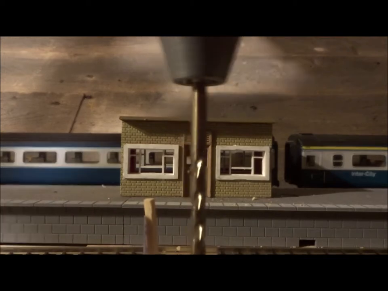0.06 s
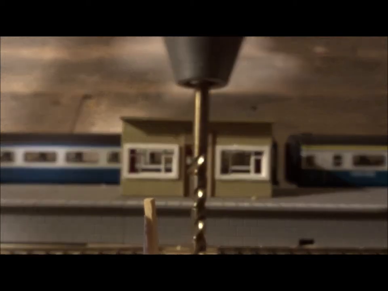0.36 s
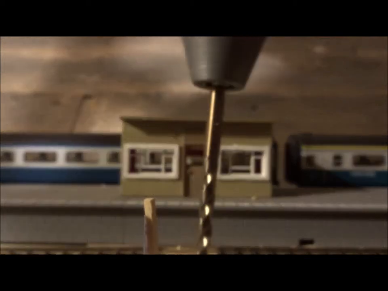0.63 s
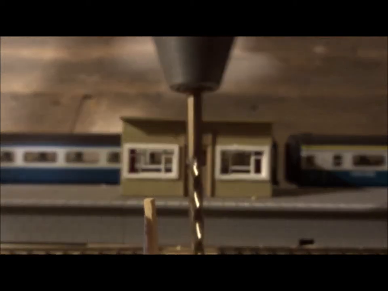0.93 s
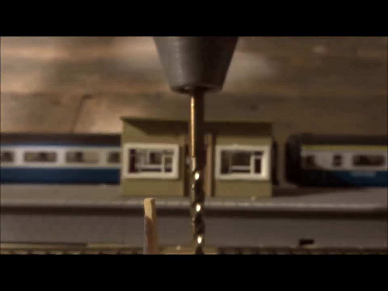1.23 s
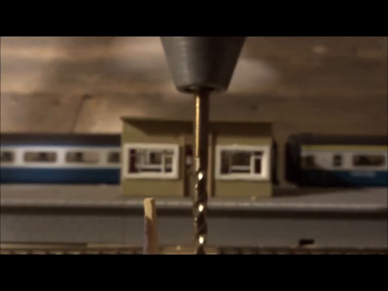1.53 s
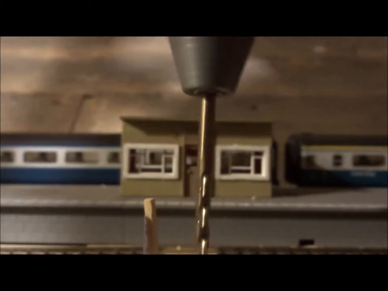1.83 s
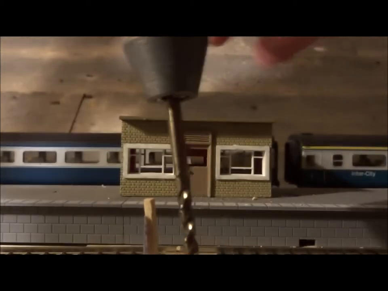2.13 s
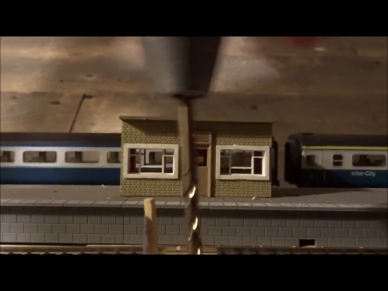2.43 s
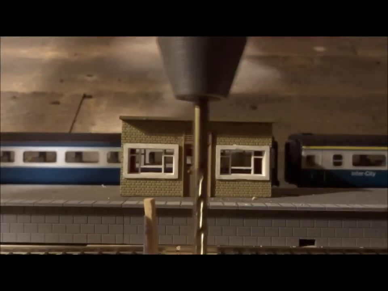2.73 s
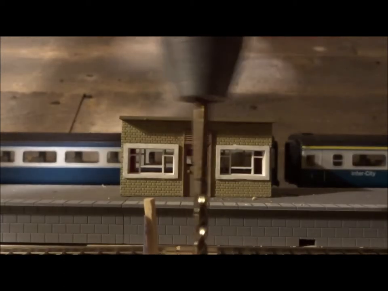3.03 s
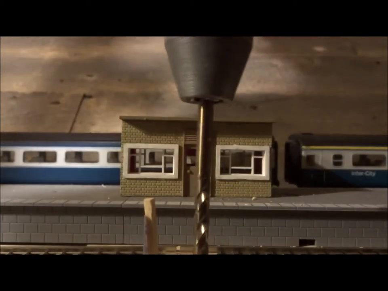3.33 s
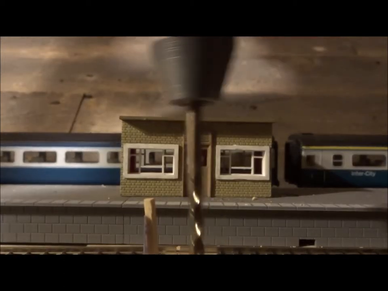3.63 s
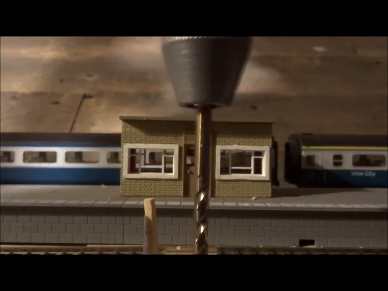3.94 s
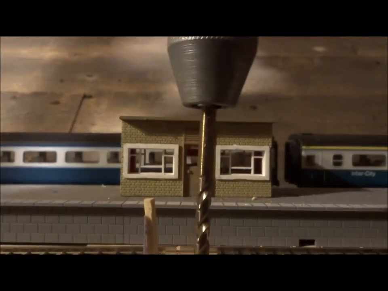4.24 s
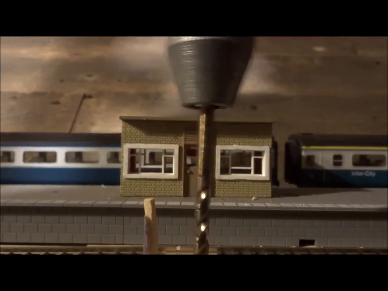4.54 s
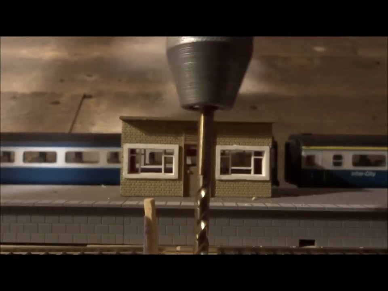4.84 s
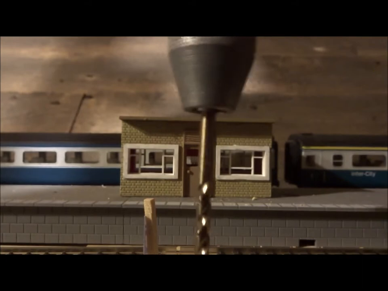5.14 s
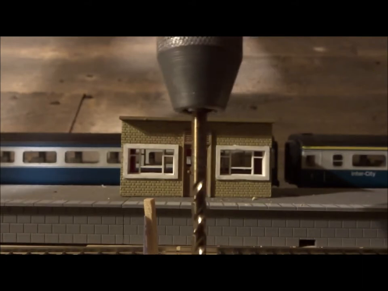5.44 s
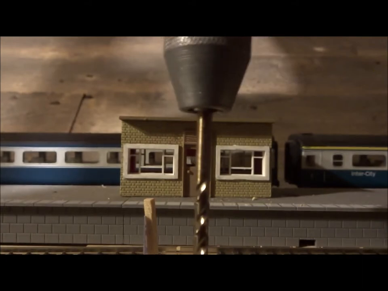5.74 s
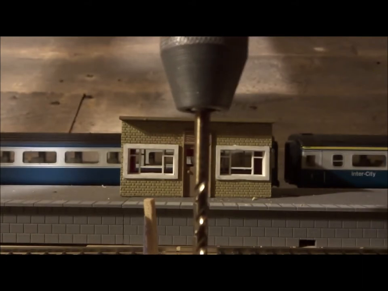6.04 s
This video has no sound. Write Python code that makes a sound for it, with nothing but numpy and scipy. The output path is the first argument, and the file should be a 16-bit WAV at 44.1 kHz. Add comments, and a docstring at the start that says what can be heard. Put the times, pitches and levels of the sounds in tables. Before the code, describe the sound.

A drill bit is turned by hand into a wooden board, close to a stereo microphone in a small room. It starts with a soft hiss in the hole, then from 0.5 seconds grinds and snaps fibres, the board resounding hollowly. Just after 1 second the loose steel chuck clacks several times and rings thinly. The bit binds with a short high squeak at 1.7 seconds and cracks at 1.9. The hardest cracking comes around 2.6 seconds, with another squeak. Sharp chuck clacks and a thin metallic singing follow near 3 seconds. Uneven, crackling strokes return from 3.3 to 3.8 seconds, then another clack just after 4. A last quick run of squeaks near 4.9 seconds leads to a rattle and scrape of the chuck around 5.3, then fainter rasping. A faint fan-like whirr lies to the left throughout.

```python
"""A twist bit turned by hand into a wooden baseboard in a small room; stereo microphone, close up.
The flutes hiss in the hole, then the lips grind and snap fibres and the board resounds. After 1 s the
loose chuck clacks, rubs and sets its steel ringing. The bit binds and squeaks at 1.7 s and cracks
hardest around 2.6 s. Strokes and clacks alternate up to a last run of squeaks near 4.9 s and a rattle
of the chuck. A faint fan-like whirr lies behind throughout, to the left."""
import sys
import numpy as np
from scipy import signal
from scipy.fft import rfft, irfft
from scipy.io import wavfile

SR = 44100
rng = np.random.default_rng(int(sys.argv[2]) if len(sys.argv) > 2 else 0)


def master_out(mix):
    """Clip the mix to full scale and print it as 16-bit PCM to the path in sys.argv[1]."""
    frames = np.transpose(np.atleast_2d(mix))
    ceiling = np.clip(frames, -1, 1)
    pcm = np.round(ceiling * 32767).astype(np.int16)
    wavfile.write(sys.argv[1], SR, pcm)


N = 268128
TIME = np.arange(N) / SR
SHORT = TIME[:SR // 2]  # time axis of the impulse responses

# Table levels are relative: each source adds its own gain.
# the lips bite, the load builds and lets go: (peak time [s], grind [dB], rasp [dB], rise [s], fall [s])
CUTTING_STROKES = [(0.01, -49.5, -56, 0.11, 0.11), (0.2, -52, -57, 0.15, 0.18),
                   (0.47, -52.5, -59, 0.22, 0.15), (0.72, -43, -48.5, 0.21, 0.12),
                   (0.96, -40.5, -48, 0.19, 0.096), (1.07, -55, -44, 0.071, 0.048),
                   (1.19, -50, -54.5, 0.15, 0.22), (1.745, -40.5, -49.5, 0.11, 0.073),
                   (1.94, -42, -49, 0.12, 0.085), (2.11, -54.5, -58, 0.21, 0.22),
                   (2.435, -42.5, -55, 0.047, 0.054), (2.525, -37.5, -44, 0.04, 0.044),
                   (2.66, -39, -43.5, 0.19, 0.1), (3.39, -45.5, -54.5, 0.13, 0.14),
                   (3.715, -42.5, -50.5, 0.22, 0.2), (4.21, -47.5, -56, 0.15, 0.18),
                   (4.78, -76, -54, 0.079, 0.26), (4.9, -40, -50.5, 0.11, 0.12),
                   (5.28, -54, -54.5, 0.34, 0.28)]
# the loudest fibres snapping at the lips: (time [s], crack [dB], splinter [dB])
FIBRE_SNAPS = [(0.4822, -45.5, -45), (0.676, -53, -54), (0.689, -42, -50), (0.706, -48, -58),
               (0.721, -42, -52), (0.7365, -37, -48), (0.749, -40, -47), (0.8272, -39.5, -48),
               (0.886, -45.5, -66), (0.9115, -46, -53), (0.9279, -38, -54), (0.964, -33, -53),
               (0.982, -49, -62), (1.655, -45.5, -49), (1.77, -40, -36.5), (1.8347, -47, -60),
               (1.9122, -25.5, -27.5), (1.928, -45, -61), (1.951, -41, -46), (2.4194, -34.5, -35.5),
               (2.5076, -27, -28.5), (2.5146, -30, -30.5), (2.527, -43, -43), (2.547, -38, -46),
               (2.602, -36.5, -43), (2.6315, -24.5, -28), (2.651, -23, -33), (2.6743, -27.5, -46),
               (2.8742, -47, -51), (3.3636, -40, -48.5), (3.3939, -43, -59), (3.4164, -39, -55),
               (3.4308, -61, -47), (3.573, -50, -51), (3.6201, -39.5, -52), (3.636, -46, -52),
               (3.6782, -35, -36), (3.6897, -31.5, -34.5), (3.7029, -39, -40), (3.7592, -35, -41),
               (4.4655, -46.5, -46), (4.7134, -52, -53), (4.7745, -51.5, -48.5), (4.8351, -48, -45.5),
               (5.0136, -52, -51), (5.528, -53, -83)]
# the bit binds and jerks free: (time [s], level [dB], pitch [Hz])
BIT_SQUEAKS = [(1.692, -40.5, 3660), (1.721, -31.5, 3550), (1.7327, -29, 3500), (1.7424, -28.5, 3500),
               (1.7513, -32, 3490), (2.652, -22, 3670), (2.6625, -26.5, 3470), (4.8506, -41.5, 3700),
               (4.8644, -32.5, 3500), (4.88, -29.5, 3600), (4.8927, -25, 3630), (4.9047, -31, 3580),
               (4.919, -39, 3650)]
# the wood gives under the load with a hollow knock: (time [s], level [dB], pitch [Hz])
WOOD_KNOCKS = [(0.178, -51, 228), (0.362, -51, 136), (0.429, -50.5, 400), (0.68, -42, 296),
               (0.883, -42.5, 325), (0.951, -44, 330), (1.718, -41, 237), (2.066, -53, 400),
               (2.126, -52, 314), (2.42, -45, 472), (2.509, -37.5, 767), (2.535, -41, 527),
               (2.578, -42, 436), (2.601, -38.5, 737), (2.625, -37.5, 538), (2.648, -40.5, 533),
               (2.674, -38, 522), (2.721, -45, 294), (3.016, -52.5, 128), (3.313, -47.5, 403),
               (3.365, -45.5, 302), (3.396, -48.5, 208), (3.45, -50, 375), (3.513, -50, 169),
               (3.732, -53, 100), (3.771, -52, 105), (4.041, -45.5, 390), (4.151, -39, 472),
               (4.472, -58, 115), (4.887, -41, 215), (4.903, -36, 519), (4.912, -41.5, 320),
               (5.506, -50, 532), (5.989, -52.5, 353)]
# play in the chuck:
# (time [s], clack [dB], pitch [Hz], push on the board [dB], treble splash [dB], low steel ring [dB])
CHUCK_CLACKS = [(0.214, -31.5, 3880, -73, -65, -71), (1.0616, -37, 2950, -34, -49, -83),
                (1.124, -29, 4500, -41.5, -19.5, -40.5), (1.1794, -27, 4630, -35, -22.5, -50.5),
                (1.263, -30, 5640, -50.5, -27.5, -52), (1.3315, -52.5, 1720, -54.5, -60, -74),
                (2.905, -23.5, 3060, -47.5, -27.5, -58), (2.9331, -28, 3210, -36.5, -20, -66),
                (3.0719, -36.5, 3450, -50.5, -30.5, -57), (4.143, -40, 2230, -70, -59, -80),
                (4.148, -29.5, 5170, -39, -23, -72), (4.2492, -41, 2200, -48, -47, -67),
                (5.158, -47.5, 3600, -61, -49, -87), (5.2216, -35.5, 3200, -42.5, -41, -83),
                (5.241, -46, 2830, -68, -34, -83), (5.27, -40.5, 5940, -44, -41, -75),
                (5.277, -50, 3520, -47, -27.5, -58), (5.284, -37.5, 1270, -59, -34, -60),
                (5.296, -36.5, 6330, -47.5, -58, -53.5), (5.308, -41.5, 3570, -47, -58, -72),
                (5.334, -38.5, 6760, -48, -37, -54.5), (5.391, -37.5, 3700, -43, -43, -78),
                (5.396, -45, 3360, -45, -42, -75)]
# steel sliding on steel: (peak time [s], scrape [dB], singing [dB], rise [s], fall [s])
STEEL_SLIDES = [(1.2, -55, -64, 0.17, 0.13), (2.955, -53, -70, .02, 0.28), (3.015, -65, -46, 0.06, 0.037),
                (3.08, -75, -48, 0.019, 0.034), (5.283, -36.5, -42, 0.04, 0.024),
                (5.54, -56, -73, 0.14, 0.18)]
# flutes brushing the hole: (peak time [s], hiss [dB], scrape [dB], rise [s], fall [s], pitch [Hz])
FLUTE_BRUSHES = [(0.035, -44, -51.5, 0.16, 0.062, 5900), (0.176, -44, -59, 0.053, 0.02, 6800),
                 (2.79, -57.5, -64.5, 0.25, 0.62, 9150), (4.02, -62.5, -63.5, 0.16, 0.06, 10700),
                 (4.37, -62, -62.5, 0.061, 0.16, 9100), (4.98, -75, -66, 0.2, 0.15, 7600)]

# resonances: (frequency [Hz], width [Hz], level [dB])
BOARD_BASS_MODES = [(78.6, 4.5, -10.5), (130.4, 30, -13), (179.2, 5.9, -5), (218, 14, 3), (240, 14.5, -1.5),
                    (296, 16, -2.5), (319.7, 28, -0.5), (414, 48, -1), (481.4, 64, -5)]
BOARD_MID_MODES = [(507, 28, 9), (534.3, 20, 9), (736, 72, 4), (785, 136, -6), (1015, 190, -10.5),
                   (1318, 170, -8), (1735, 150, -7.5), (2034, 28, -4), (2233, 61, -2.5)]  # these need a hard load
SLEEVE_MODES = [(1660, 43, -8), (1852, 35, -6), (2427, 65, 0.5), (2980, 68, -4), (4200, 36, -8),
                (4880, 220, 2)]  # short ring of the chuck's sleeve and jaws
STEEL_LOW_MODES = [(4607, 21, 0), (4660, 100, -9)]  # steel ringing freely
STEEL_HIGH_MODES = [(8572, 48, -2), (8721, 38, 0), (9380, 75, -14), (10713, 65, -8)]
WHIRR_BAND = [(1238, 166, 0)]

# spectral shapes: (frequency [Hz], level [dB])
BIT_SPECTRUM = [(500, -32), (1500, -0.5), (2600, 10.5), (3200, 11), (3550, 9), (3950, 5.5), (4300, -1),
                (4700, 7), (5600, -7), (11000, -1)]  # the bit, held and damped by the wood
RASP_SPECTRUM = [(400, -5), (1000, -14), (3500, -0.5), (5000, -4.5), (6300, -5.5), (7700, -2.5), (8300, -4),
                 (9200, -3.5), (11000, -7.5)]  # chips
SPLINTER_SPECTRUM = [(3000, -26), (5500, -2), (6500, -4), (7700, 5), (8600, 5), (9400, 1.5), (10400, 0),
                     (12000, -0.5)]
CHUCK_SPECTRUM = [(400, -10), (1100, -12), (1450, 8), (1950, 1), (2400, 7), (3050, 12), (3600, 8),
                  (4300, 3.5), (5200, 2.5), (6500, 0.5), (11000, -12)]
SCRAPE_SPECTRUM = [(300, 1.5), (900, -1), (1280, 6), (1950, -4), (2400, 3.5), (3300, 12), (4700, 1),
                   (6500, -4), (11000, -56)]  # steel on steel
FLUTE_HISS_SPECTRUM = [(800, -21), (2000, -5.5), (4600, -4), (5800, 2), (7800, -3), (10000, 5.5),
                       (11500, -2)]
REFLECTION_SPECTRUM = [(60, -22.5), (300, -11), (1000, 11), (3300, 1), (6000, 0.5), (11000, 0)]
ROOM_TONE_SPECTRUM = [(25, -22), (60, -16), (110, -10.5), (200, 0.5), (300, -3), (500, -5.5), (800, -12),
                      (2000, -19.5), (11000, -20.5)]


def cutting(grind, rasp):
    """The lips grind through the wood: coarse breaks shake board and bit, fine ones rasp."""
    idle_grind = from_db(-89)  # the bit turning without load
    idle_rasp = from_db(-74) * waver(depth_db=-0.5, rate_hz=15)
    grind, rasp = np.hypot(grind, idle_grind), np.hypot(rasp, idle_rasp)
    hardness = (grind / from_db(-42.5)) ** 0.46
    coarse = from_db(1) * grind * grains(per_s=380, spread_db=4, clump_db=1.5, clump_hz=71.4)
    crunch = from_db(-15.5) * grind * grains(per_s=2800, spread_db=6, clump_db=9, clump_hz=135.4)
    fine = from_db(-1.5) * rasp * grains(per_s=8000, spread_db=5, clump_db=4, clump_hz=173.4)
    return (board(coarse, hardness) + through(crunch, colour(BIT_SPECTRUM))
            + through(fine, colour(RASP_SPECTRUM)))


def snapping(rasp):
    """A fibre gives way and the board springs back; small slips crackle in between."""
    snap_s, snap_db, splinter_db = np.transpose(FIBRE_SNAPS)
    slip_s, slip_db = slips(rasp, per_s=57, jitter=0.47, scatter_db=9)
    times, crack_db = np.r_[snap_s, slip_s], np.r_[snap_db, slip_db - 5.5]
    crack = from_db(17.5) * contacts(times, crack_db, burst_s=0.00061, after_db=-13, after_s=0.0073)
    splinter = from_db(22) * contacts(snap_s, splinter_db, burst_s=0.0005, after_db=-13.5, after_s=0.0064)
    push_db = -17.5 + 0.8 * (snap_db + 35)  # a louder crack pushes the board harder
    recoil = filtered(pushes(snap_s, push_db), "high", corner_hz=196)
    return (through(crack, colour(BIT_SPECTRUM)) + through(splinter, colour(SPLINTER_SPECTRUM))
            + board(recoil, hardness=1.27))


def slips(load, per_s, jitter, scatter_db):
    """The lips stick and slip at an uneven rate, as strongly as the load: times [s] and levels [dB]."""
    gap, strength = rng.standard_normal((500, 2)).T
    times = np.cumsum(np.exp(jitter * gap)) / per_s
    levels_db = 20 * np.log10(np.interp(times, TIME, load)) + scatter_db * np.clip(strength, -2, 2)
    inside = times < TIME[-1]
    return times[inside], levels_db[inside]


def squeaking():
    """The binding bit jerks free in quick runs; each jerk rings two bending modes and shakes the board."""
    times, level_db, pitch_hz = np.transpose(BIT_SQUEAKS)
    free_hz, overtone_ratio = 3400, 2.92
    # the harder the bit is wedged, the higher and shorter its squeak
    width_hz = 244 + np.maximum(pitch_hz - free_hz, 0)
    ring = pings(times, level_db, pitch_hz, width_hz)
    ring += pings(times, level_db - 13.5, overtone_ratio * pitch_hz, overtone_ratio * width_hz)
    scuff = from_db(11.5) * contacts(times, level_db, burst_s=0.0007, after_db=-8, after_s=0.0091)
    jerk = filtered(pushes(times, level_db + 15), "high", corner_hz=249)
    return from_db(16.5) * ring + through(scuff, colour(RASP_SPECTRUM)) + board(jerk, hardness=0.92)


def knocking():
    """A soft blow shakes the whole board; where the leaning bit loads it decides which mode speaks most."""
    times, level_db, pitch_hz = np.transpose(WOOD_KNOCKS)
    blow = from_db(28) * contacts(times, level_db, burst_s=0.00075, after_db=-16, after_s=0.01)
    return from_db(25.5) * pings(times, level_db, pitch_hz, width_hz=63) + board(blow, hardness=0.48)


def board(force, hardness):
    """The board answers a force; a hard load wakes its higher modes too."""
    bass = filtered(through(force, body(BOARD_BASS_MODES)), "low", corner_hz=740)
    mid = filtered(through(force * hardness, body(BOARD_MID_MODES)), "high", corner_hz=364)
    return bass + filtered(mid, "low", corner_hz=2120)


def clacking():
    """The chuck knocks across its play, chatters, and leaves the steel ringing."""
    times, clack_db, pitch_hz, push_db, splash_db, low_db = np.transpose(CHUCK_CLACKS)
    ping = from_db(20) * pings(times, clack_db, pitch_hz, width_hz=560)
    tick = filtered(pushes(times, clack_db + 14), "high", corner_hz=2480)
    chatter = from_db(20) * contacts(times, clack_db, burst_s=0.00095, after_db=0, after_s=0.0064)
    splash = from_db(10.5) * contacts(times, splash_db, burst_s=0.0025, after_db=-9, after_s=0.0067)
    rattle = through(chatter, colour(CHUCK_SPECTRUM)) + through(splash, colour(SPLINTER_SPECTRUM))
    # a light contact leaves the board's lowest modes almost still
    knock = filtered(pushes(times, push_db + 26), "high", corner_hz=423)
    ring = sleeve(times, clack_db + 4, scatter_db=9.5)
    ring += steel(times, low_db + 38.5, STEEL_LOW_MODES)
    ring += steel(times, splash_db + 12.5, STEEL_HIGH_MODES)
    return tick + ping + rattle + board(knock, hardness=1.28) + ring


def sleeve(times, levels_db, scatter_db):
    """Every clack wakes each mode of the chuck with a strength of its own."""
    offsets_db = scatter_db * rng.uniform(-1.6, 1, (len(times), len(SLEEVE_MODES)))
    return sum(through(pushes(times, levels_db + db + own_db), body([(hz, width, 0)]))
               for (hz, width, db), own_db in zip(SLEEVE_MODES, offsets_db.T))


def steel(times, levels_db, modes, longest_free_s=0.046, choke_s=0.009):
    """The steel rings from each clack until the jaws grip again, sooner after a lighter blow."""
    open_s = longest_free_s * from_db(levels_db - levels_db.max())
    free_s = np.minimum(np.diff(times, append=np.inf), open_s)
    choke = np.exp(-np.maximum(SHORT - free_s[:, None], 0) / choke_s)
    return placed(times, levels_db, body(modes) * choke)


def rubbing():
    """Sliding steel scrapes and sings one thin, steady note of uneven strength."""
    scrape, sing = swells(STEEL_SLIDES)
    friction = grains(per_s=17000, spread_db=0, clump_db=3.5, clump_hz=208)
    note = tone(hz=np.full(N, 8712)) * waver(depth_db=3, rate_hz=130)
    return through(scrape * friction, colour(SCRAPE_SPECTRUM)) + sing * note


def brushing(width_hz=660, sag_hz_per_s=5000):
    """Each flute hisses along the wall of the hole; its narrow scrape sinks as it turns past."""
    wander = waver(depth_db=0.2, rate_hz=25)
    band = unit_energy(filtered(noise(), "low", corner_hz=width_hz / 2)) * np.sqrt(N)
    friction = through(noise(), colour(FLUTE_HISS_SPECTRUM))
    out = np.zeros(N)
    for peak_s, *swell, pitch_hz in FLUTE_BRUSHES:
        hiss, scrape = swells([(peak_s, *swell)])
        sinking_hz = pitch_hz * wander - sag_hz_per_s * (TIME - peak_s)
        out += hiss * friction + scrape * band * tone(sinking_hz)
    return out


def room(x, t60_s, wet_db, apart_db):
    """Dense reflections from bench and walls reach each side of the microphone partly different."""
    envelope = from_db(-60 * SHORT / t60_s) * (1 - np.exp(-(SHORT / 0.0018) ** 2))
    shared, left, right = rng.standard_normal((3, len(SHORT)))
    tails = [unit_energy(envelope * (shared + from_db(apart_db) * own)) for own in (left, right)]
    tinted = through(x, colour(REFLECTION_SPECTRUM))
    return from_db(wet_db) * np.array([through(tinted, tail) for tail in tails])


def background():
    """Low room tone, partly shared between the two sides, and a diffuse whirr left of the microphone."""
    shared = noise()
    low = [through(shared + from_db(-1.5) * noise(), colour(ROOM_TONE_SPECTRUM)) for side in range(2)]
    whirr = [through(noise(), body(WHIRR_BAND)) for side in range(2)]
    return from_db(-63.5) * np.array(low) + from_db([[-60], [-65]]) * np.array(whirr)


def swells(rows, depth_db=20):
    """Each row climbs depth_db over its rise and drops as much over its fall; one gain per dB column."""
    power = 0
    for peak_s, *levels_db, rise_s, fall_s in rows:
        away = np.maximum((peak_s - TIME) / rise_s, (TIME - peak_s) / fall_s)
        envelope = from_db(-depth_db * np.minimum(away, 10))
        power = power + np.outer(from_db(levels_db), envelope) ** 2
    return np.sqrt(power)


def grains(per_s, spread_db, clump_db, clump_hz):
    """Tiny breaks of uneven size that come in clumps; power 1."""
    sizes = from_db(spread_db * np.minimum(rng.exponential(1, N), 4)) * rng.choice([-1, 1], N)
    breaks = sizes * waver(clump_db, clump_hz) * (rng.random(N) < per_s / SR)
    return unit_energy(breaks) * np.sqrt(N)


def contacts(times, levels_db, burst_s, after_db, after_s, rise_s=0.00025):
    """Each contact is a brief burst of force followed by weaker, dying chatter."""
    t = SHORT[:SR // 8]
    decay = np.exp(-t / burst_s) + from_db(after_db) * np.exp(-t / after_s)
    envelope = unit_energy((1 - np.exp(-t / rise_s)) * decay)
    return placed(times, levels_db, envelope * rng.choice([-1, 1], (len(times), len(t))))


def pushes(times, levels_db):
    """One clean impulse per blow."""
    return placed(times, levels_db, np.ones((len(times), 1)))


def pings(times, levels_db, pitch_hz, width_hz):
    """One damped tone per contact; the wider its band, the faster it swells and dies."""
    t = SHORT[:SR // 8]
    envelope = t * np.exp(-np.pi * np.outer(width_hz, t))
    return placed(times, levels_db, unit_energy(envelope * np.sin(2 * np.pi * np.outer(pitch_hz, t))))


def placed(times, levels_db, shapes):
    """Lay one shape per event on the time line."""
    out = np.zeros(N + len(SHORT))
    for time_s, db, shape in zip(times, levels_db, shapes):
        start = round(time_s * SR)
        out[start:start + len(shape)] += from_db(db) * shape
    return out[:N]


def body(modes):
    """Impulse response of a set of damped modes, heard near the point that is driven."""
    rings = (from_db(db) * width * np.exp(-np.pi * width * SHORT) * np.cos(2 * np.pi * hz * SHORT)
             for hz, width, db in modes)
    return unit_energy(sum(rings))


def colour(points, size=4096):
    """Causal (minimum-phase) impulse response with a given spectrum."""
    hz, db = np.transpose(points)
    grid_hz = np.maximum(np.fft.rfftfreq(size, 1 / SR), 1)
    gain = from_db(np.interp(np.log(grid_hz), np.log(hz), db))
    cepstrum = irfft(np.log(gain))
    cepstrum[1:size // 2] *= 2
    cepstrum[size // 2 + 1:] = 0
    return unit_energy(irfft(np.exp(rfft(cepstrum))))


def through(force, response):
    """Pass a force through a response."""
    return signal.oaconvolve(force, response)[:N]


def filtered(x, kind, corner_hz):
    """Second-order high- or low-pass."""
    return signal.sosfilt(signal.butter(2, corner_hz, kind, fs=SR, output="sos"), x)


def tone(hz):
    """A sine of power 1 that follows a pitch curve."""
    return np.sqrt(2) * np.sin(2 * np.pi * np.cumsum(hz) / SR)


def waver(depth_db, rate_hz):
    """A gain that wanders at random about 1."""
    return from_db(depth_db * np.interp(TIME * rate_hz, np.arange(N), np.clip(noise(), -2, 2)))


def noise():
    """White noise of power 1."""
    return rng.standard_normal(N)


def unit_energy(x):
    """Scale a response so that it leaves the power of noise unchanged."""
    return x / np.sqrt(np.sum(x ** 2, axis=-1, keepdims=True) + 1e-20)


def from_db(db):
    """Decibels to gain."""
    return 10 ** (np.asarray(db) / 20)


def scene():
    """The drill stands close to the microphone, slightly to the right, with the small room behind."""
    grind, rasp = swells(CUTTING_STROKES)
    drill = (cutting(grind, rasp) + snapping(rasp) + squeaking() + knocking()
             + clacking() + rubbing() + brushing())
    direct = drill * from_db([[-0.4], [0.4]])
    return direct + room(drill, t60_s=0.16, wet_db=-9, apart_db=4.5) + background()


def record(dry):
    """A low cut thins the deep bass, and the top is cut steeply."""
    thinned = filtered(dry, "high", corner_hz=64.3)
    cutoff_hz = 10900
    return signal.sosfilt(signal.cheby1(12, 0.3, cutoff_hz, fs=SR, output="sos"), thinned)


dry = scene()
out = record(dry)
master_out(out)
```